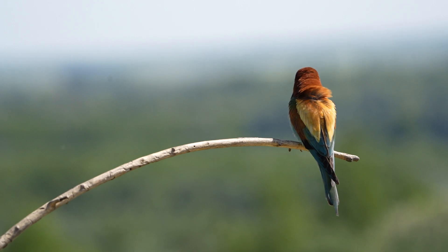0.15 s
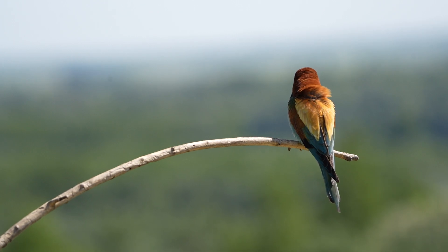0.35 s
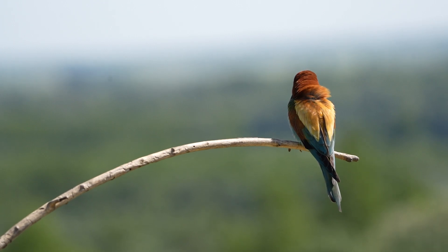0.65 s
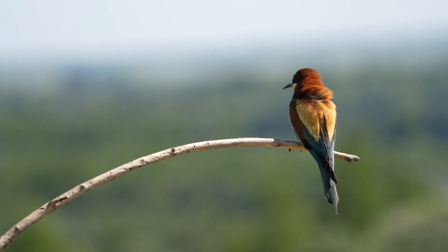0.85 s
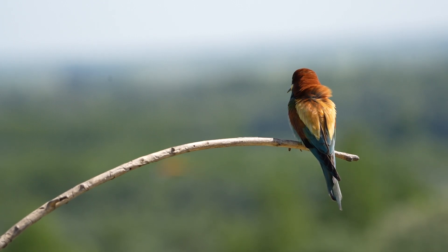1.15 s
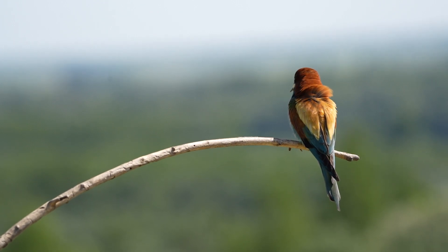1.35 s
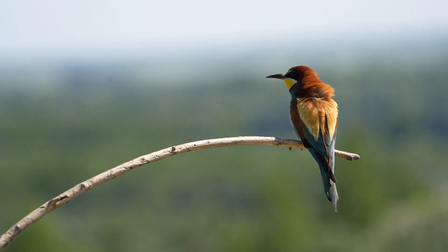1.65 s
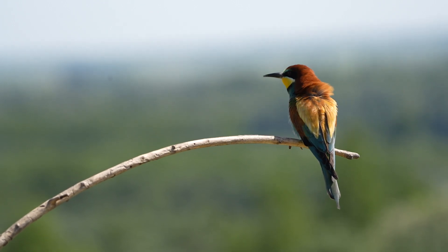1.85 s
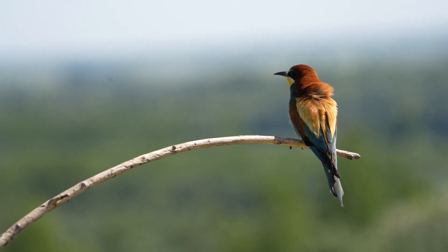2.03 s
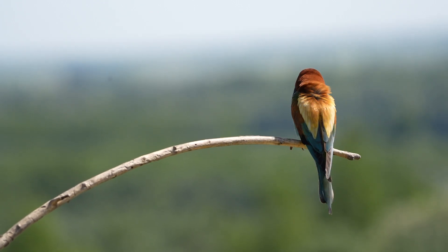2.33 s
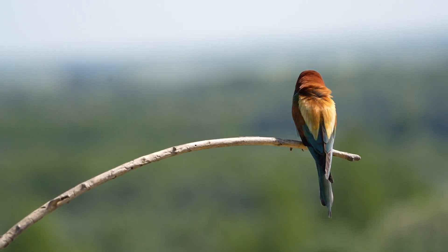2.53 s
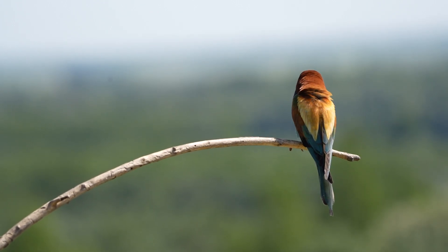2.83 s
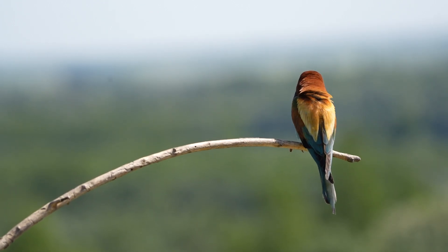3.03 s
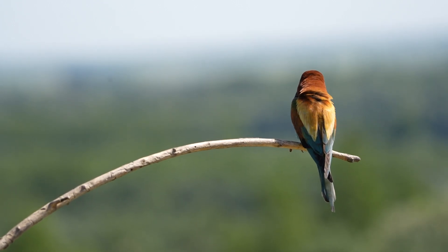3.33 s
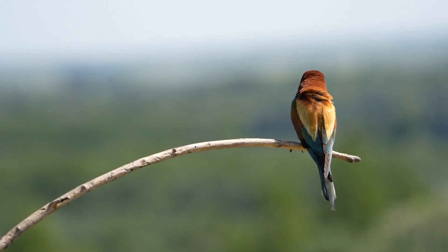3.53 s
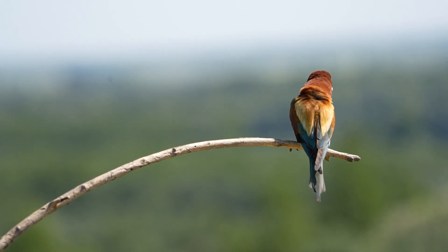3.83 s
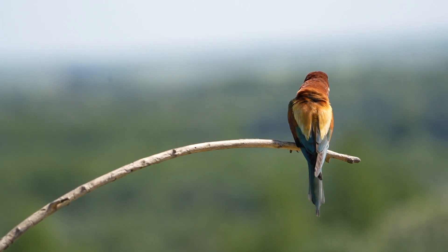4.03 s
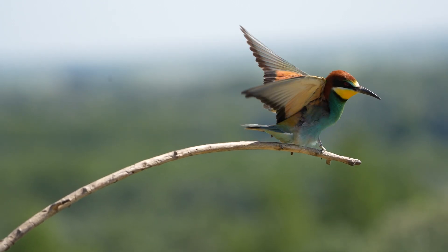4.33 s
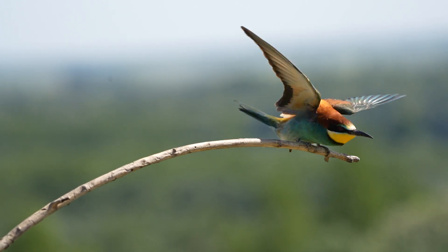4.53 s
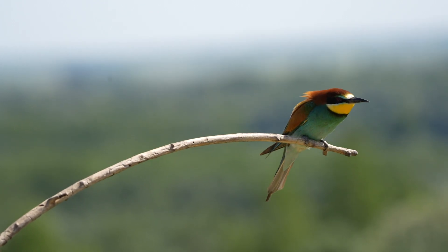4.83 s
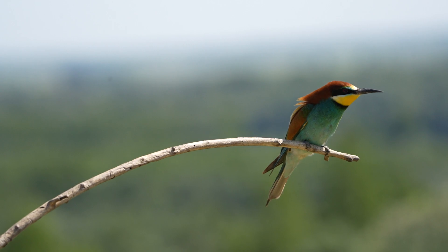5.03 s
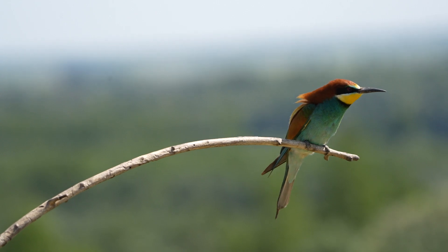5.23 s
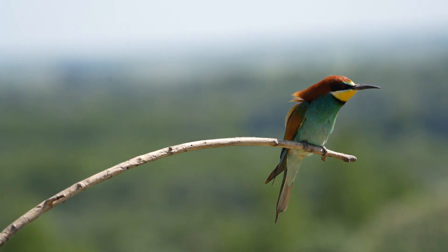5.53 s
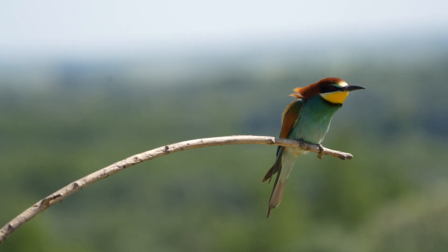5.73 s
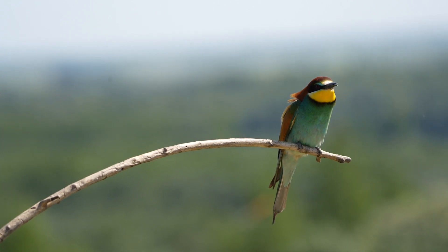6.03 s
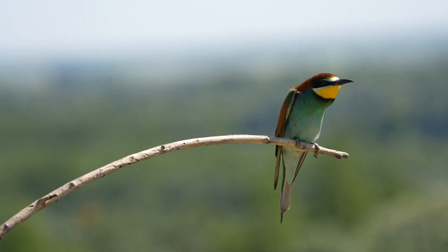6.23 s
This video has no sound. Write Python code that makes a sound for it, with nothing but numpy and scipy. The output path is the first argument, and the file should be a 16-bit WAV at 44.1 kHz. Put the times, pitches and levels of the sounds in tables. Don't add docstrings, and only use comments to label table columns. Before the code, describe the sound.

Mellow rolling bird calls sound close by, separated by gaps of faint colony whistles, high buzzy chirps, soft distant traffic hum and leaf hiss.

```python
import sys
import numpy as np
from scipy import signal
from scipy.fft import rfft, irfft, next_fast_len
from scipy.io import wavfile
from scipy.ndimage import uniform_filter1d, map_coordinates

SR = 44100
rng = np.random.default_rng(int(sys.argv[2]) if len(sys.argv) > 2 else 0)


def wrap_up_sound(samples):
    columns = np.atleast_2d(samples).T
    tamed = np.clip(columns, -1, 1)
    steps = np.round(tamed * 32767).astype(np.int16)
    wavfile.write(sys.argv[1], SR, steps)


def decibels_to_gain(level_db):
    exponent = np.asarray(level_db, float) / 20
    return 10 ** exponent


N = 281358
TIME_S = np.arange(N) / SR

# start t/s, length t/s, plateau f/Hz, level/dB, L-R level/dB
NEAR_CALLS = [
    (-.055, 0.1, 1970, 0, -8),
    (1.579, 0.067, 1780, 0, -9.5),
    (2.238, .067, 1732, 1.5, -9.5),
    (3.098, .05, 1684, -20, -17),
    (4.161, 0.11, 1918, 0.5, -8),
    (4.333, .108, 1895, -11, -13.5),
    (5.326, .08, 1820, -29, -5),
    (6.13, .109, 1874, 0.5, -8),
]
# centre t/s, half width t/s, rise f/Hz, level/dB
FLICKS = [(.0, 0.0065, 482, 7), (0.026, .006, 293, 3.5), (1.620, .005, 543, -1), (2.279, .0045, 416.3, 1.5),
          (3.127, 0.0079, 600, 2), (4.193, .0056, 524, 3), (4.216, .007, 418, 2), (4.241, .005, 330, 3.5),
          (4.364, .0074, 257, 5), (4.382, .0037, 117, -3), (4.412, .014, 131, 3), (5.347, 0.009, 484, 3.5),
          (5.385, .008, 240, -1.5), (6.163, 0.0056, 507, -4.5), (6.186, 0.0067, 398, -7),
          (6.21, 0.0052, 231, -3.5)]
# t/s, dip level/dB
CATCHES = [(1.62, -1), (2.2799, -1), (4.188, -3), (4.2229, -6), (4.2435, -8), (4.385, -17), (6.1592, -7),
           (6.181, -12)]
# f/Hz, level/dB
THROAT = [(1290, -25), (1400, -21.5), (1500, -20.5), (1650, -20.5), (1750, -17), (1850, -8.5), (1950, -7.5),
          (2080, -10.5), (2200, -9), (2400, -14)]
# multiple, level/dB
OVERTONES = [(2, -48.5), (3, -51), (4, -59), (5, -65), (6, -59), (7, -79)]

# start t/s, length t/s, top f/Hz, end f/Hz, level/dB
FAR_LEFT = [(1.675, 0.03, 1820, 1700, -34.5), (1.737, 0.025, 1607, 1570, -37),
            (1.78, 0.034, 1873, 1590, -31), (4.531, 0.033, 2010, 1610, -37.5),
            (5.062, 0.033, 1856, 1830, -46), (5.09, 0.034, 2016, 1760, -39.5),
            (6.321, .043, 2040, 1757, -40.5)]
FAR_RIGHT = [(2.467, 0.033, 2350, 2055, -49.5), (2.784, 0.037, 1905, 1680, -40),
             (2.852, 0.05, 2095, 1590, -39.5), (2.922, 0.015, 1606, 1550, -50),
             (3.232, 0.052, 1840, 1512, -35), (3.28, 0.046, 1598, 1540, -39.5),
             (3.333, 0.027, 1713, 1510, -32), (4.661, 0.043, 1980, 1650, -41),
             (4.731, 0.066, 2120, 1610, -41.5)]
FAR_AHEAD = [(.886, 0.042, 1940, 1860, -52), (0.948, .04, 1980, 1860, -46),
             (1.089, 0.032, 1937, 1770, -46.5), (1.2, 0.07, 1800, 1550, -51),
             (2.526, .033, 1986, 1810, -42.5), (2.628, .042, 1736, 1610, -51),
             (2.98, .033, 1920, 1800, -49.5), (3.039, .032, 2005, 1890, -46),
             (3.874, 0.026, 1980, 1710, -42.5), (4.077, 0.02, 1910, 1690, -49.5),
             (4.62, 0.028, 2040, 1960, -52), (4.702, .024, 2166, 2000, -50)]
# L-R level/dB, overtone level/dB, rise t/s, rise over top f [ratio]
FAR_HABITS = [(11, -34, 0.0164, 0.163), (-23.5, -37, 0.01234, 0.13), (-2.5, -37, .0127, .12)]

# start t/s, pitch factor, stretch factor, level/dB, buzz level/dB
CHIRPS = [(-.011, 1.002, 1.04, -25.5, -30), (1.097, .995, 1.025, -34.5, -33),
          (2.214, 1.015, 0.94, -26, -34), (3.176, 1.003, 0.97, -28, -34.5),
          (3.816, 1.007, 1.02, -24, -29.5), (4.572, .98, 1.007, -26, -29.5), (5.253, .97, 1.01, -27, -30.5),
          (5.990, 1.015, 1.035, -27.5, -30)]
# t/s, f/Hz, level/dB
ARCH = [(-.002, 3960, -22.5), (.002, 4500, -5), (.0095, 5930, -2), (.023, 5640, -3.5), (.0275, 5830, 1),
        (.031, 3900, -7.5), (.033, 3670, -16)]
BUZZ = [(.037, 6030, -22), (.048, 5100, -7), (.054, 4550, -14), (.059, 4820, -4), (0.072, 5430, -7.5),
        (.083, 6600, -24)]
HOOK = [(.069, 2840, -23), (.076, 3620, -12.5), (.083, 4350, -5), (.090, 4670, -0.5), (.104, 4770, -6.5),
        (0.108, 4150, -15), (.121, 5130, -26), (.125, 4500, -45)]
ROUGHNESS = [(1, .1, 0.25, 0.28), (0.97, 0.99, 0.82, 0.74), (.05, .3, 0.8, .4)]
BEAT_HZ = [319, 626, 267]
OCTAVE_DB = [-35, -38, -35.5]
# from t/s, to t/s, centre f/Hz, width f/Hz, level re chirp/dB
LEAKS = [(-.022, .115, 5020, 1020, -22), (.032, 0.083, 10040, 800, -38.5)]

# start t/s, length t/s, resonance f/Hz, level/dB, L-R level/dB
RASPS = [
    (.93, 0.061, 4000, -50, 9),
    (3.579, 0.09, 2600, -52, -2),
    (4.125, 0.04, 7060, -48, 2),
    (4.293, .11, 2860, -47.5, 3),
    (5.109, .071, 6200, -34.5, 10),
    (5.836, 0.058, 4810, -53, -15),
]
# t/s, peak level/dB, L-R level/dB, f/Hz
TICKS = [
    (0.462, -30.5, 26, 12200),
    (.841, -41.5, -16, 9700),
    (1.333, -43, -11, 9900),
    (1.889, -44.5, -12, 10300),
    (2.478, -47, -4, 9000),
    (3.147, -40.5, -15, 10260),
    (4.3308, -34.5, 20, 13000),
    (4.437, -41, -9, 7130),
]

# t/s, level/dB
TRAFFIC = [(0.0, -43.5), (0.41, -44.5), (0.92, -45), (1.58, -45.5), (2.22, -43.5), (2.52, -43.5),
           (2.74, -42), (3.0, -45.5), (3.87, -45), (4.92, -44), (5.08, -44), (5.93, -43), (6.38, -41.5)]
# f/Hz, level/dB per Hz
RUMBLE = [(12, -33), (20, -1.5), (81, -3.5), (151, -2), (300, -7.5), (392, -17.5), (500, -16), (650, -31),
          (1100, -120)]
ROAD = [(210, -38.5), (350, -9), (394, -14.5), (425, -9.5), (599, -8.5), (757, -3), (859, -5), (950, -2),
        (1580, -13.5), (1830, -14), (2600, -24), (3380, -58), (5720, -120)]
PASSING = [(450, -38), (620, -9), (780, 3), (950, -3), (1150, -7), (1500, -58)]
LEAVES = [(1300, -13), (2200, -1.5), (2700, 0), (3400, -0.5), (4300, -5), (5300, -4.5), (5800, -11),
          (6800, -14.5), (8500, -20), (11000, -45)]
MIC_HISS = [(2000, -7), (6000, -1.5), (11000, -1.5), (16000, -2)]
# f/Hz, correlation [-1..1]
ALIKE = [(30, .999), (120, .99), (230, 0.97), (440, 0.74), (870, 0.73), (1690, -0.079), (3300, -0.31),
         (6430, -0.2), (9000, 0.1)]
# f/Hz, L-R level/dB
LEAN = [(40, 0), (100, -1), (170, -0.5), (280, -4), (480, -4.5), (810, -10), (1350, -9), (2280, -7),
        (3830, -1.5), (6430, -4.5), (9000, -0.5)]
# f/Hz, extra L-R level/dB, left lead phase/rad
AHEAD = [(2120, 3, 0), (2340, 0, 1), (2580, 6.5, 0.83)]
HEDGE = [(4250, 10, -3), (4500, 14, -8), (4900, 25, -3), (4980, 21, 1), (5450, 3, 1.7), (6330, 3, 2),
         (6200, -2.5, 2), (9000, -4, 1)]
BEHIND = [(3020, 11, -0.5), (4600, -8, -2.5), (6000, 0, -1.3), (7150, -9.5, -5), (9000, 12, 0.5)]


def near_bird():
    base_hz, glide_share = 1290, 0.12
    longest_gap_s, catch_s = 0.04, 0.0009
    turn_s, turned_db = 4.5, 9.5
    out = np.zeros((2, N))

    gaps_s = np.diff(np.transpose(FLICKS)[0], prepend=0, append=np.inf)
    opens_roll = (gaps_s[:-1] > longest_gap_s) & (gaps_s[1:] < longest_gap_s)
    flick_hz, flick_db = np.zeros(N), np.zeros(N)
    for (centre_s, half_s, rise_hz, db), first in zip(FLICKS, opens_roll):
        squareness = 4.9 if first else 2.15
        bump = np.exp(-np.abs((TIME_S - centre_s) / half_s) ** squareness)
        flick_hz += bump * rise_hz
        flick_db += bump * db
    catch_db = sum(db * np.exp(-((TIME_S - s) / catch_s) ** 2) for s, db in CATCHES)
    air_noise = filtered(rng.standard_normal(N), lambda hz: decibels_to_gain(along(LEAVES, hz)))
    breath = decibels_to_gain(-53) * unit(air_noise)

    for start_s, length_s, plateau_hz, db, pan_db in NEAR_CALLS:
        span = slice(max(round(start_s * SR), 0), round((start_s + length_s) * SR))
        since_s = TIME_S[span] - start_s
        left_s = start_s + length_s - TIME_S[span]
        glide_s = glide_share * length_s
        arch = (1 - np.exp(-since_s / glide_s)) * (1 - np.exp(-left_s / (1.1 * glide_s)))
        jitter_hz = 9 * wobble(312, size=len(since_s))
        hz = base_hz + (plateau_hz - base_hz) * arch + flick_hz[span] + jitter_hz
        edge = np.clip(np.minimum(since_s / 0.0034, left_s / 0.0082), 0, 1)
        level = edge * decibels_to_gain(db + catch_db[span] + 0.27 * wobble(300, size=len(since_s)))
        facing_db = turned_db * (start_s > turn_s)
        overtones = [(k, k_db - 0.33 * db - 6.0 + facing_db * (k > 3)) for k, k_db in OVERTONES]
        gain = decibels_to_gain(along(THROAT, hz) + flick_db[span])
        voice = whistle(hz, overtones, gain, flicker_hz=330, steady=3.25)
        out[:, span] += panned(pan_db) * level * (voice + arch * decibels_to_gain(facing_db) * breath[span])
    return ports(out, AHEAD)


def colony():
    out = np.zeros((2, N))
    for group, habit in zip([FAR_LEFT, FAR_RIGHT, FAR_AHEAD], FAR_HABITS):
        pan_db, overtone_db, rise_s, rise_ratio = habit
        overtones = [(2, overtone_db), (3, overtone_db - 4.0)]
        for start_s, length_s, top_hz, end_hz, db in group:
            u = np.linspace(0, 1, round(length_s * SR))
            crest = np.clip(rise_s / length_s, 0.2, 0.62)
            before = np.clip(1 - u / crest, 0, 1) ** 1.9
            after = np.clip((u - crest) / (1 - crest), 0, 1) ** 0.886
            below_hz = rise_ratio * top_hz * before + (top_hz - end_hz) * np.sin(np.pi / 2 * after) ** 2
            flutter_db = 1.6 * wobble(150, size=len(u))
            level = decibels_to_gain(db + 3.0 + flutter_db) * np.sin(np.pi * u ** 0.84) ** 0.5
            voice = whistle(top_hz - below_hz, overtones, steady=3.1)
            add(out, panned(pan_db) * level * voice, round(start_s * SR))
    return out


def songbird():
    hook_db = 2.5
    leak_grows, usual_db = 0.4, -24.5
    octave_hz, octave_width_hz = 4970, 330
    out = np.zeros((2, N))
    hisses = [leak(centre_hz, width_hz) for _, _, centre_hz, width_hz, _ in LEAKS]
    for start_s, pitch, stretch, chirp_db, buzz_db in CHIRPS:
        for hiss, (begin_s, end_s, *_, db) in zip(hisses, LEAKS):
            u = (TIME_S - start_s - begin_s * stretch) / ((end_s - begin_s) * stretch)
            swell = np.sin(np.pi * np.clip(u, 0, 1)) ** 0.27 * (u < 1)
            out += decibels_to_gain(chirp_db + leak_grows * (chirp_db - usual_db) + db) * hiss * swell

        notes_db = [chirp_db, buzz_db, chirp_db + hook_db]
        parts = zip([ARCH, BUZZ, HOOK], notes_db, ROUGHNESS, BEAT_HZ, OCTAVE_DB)
        for note, note_db, steps, beat_hz, octave_db in parts:
            knots_s, hz, db = np.transpose(note)
            t = np.arange(knots_s[0], knots_s[-1], 1 / (SR * stretch))
            step_s = np.linspace(knots_s[0], knots_s[-1], len(steps))
            rough = np.clip(np.interp(t, step_s, steps), 0, 1)
            beat = np.sin(2 * np.pi * np.cumsum(beat_hz + 40 * wobble(58, size=len(t))) / SR)
            sung_hz = pitch * np.interp(t, knots_s, hz)
            octave = [(2, octave_db - ((sung_hz - octave_hz) / octave_width_hz) ** 2)]
            jitter_hz = 170 * rough * wobble(900, size=len(t))
            tone = whistle(sung_hz + jitter_hz, octave, flicker_hz=570, steady=0.37)
            breath = 1.2 * rough * wobble(900, size=len(t)) + 0.22 * rough * wobble(3500, size=len(t))
            level = decibels_to_gain(note_db + np.interp(t, knots_s, db))
            voice = level * tone * (1 + 0.91 * rough * beat + breath)
            add(out, np.array([voice, voice]), round((start_s + knots_s[0] * stretch) * SR))
    return ports(out, HEDGE)


def leak(centre_hz, width_hz):
    noise = rng.standard_normal(N)
    return unit(filtered(noise, lambda hz: np.exp(-((hz - centre_hz) / width_hz) ** 2)))


def rasps():
    out = np.zeros((2, N))
    for start_s, length_s, throat_hz, db, pan_db in RASPS:
        u = np.linspace(0, 1, round(length_s * SR))
        pulse_hz = (554 + 0.066 * throat_hz) * (1 + 0.048 * wobble(400, size=len(u)))
        pulses = np.diff(np.floor(np.cumsum(pulse_hz) / SR), prepend=0)
        pulses = pulses + 0.15 * rng.standard_normal(len(u)) * (u + 0.15)
        voice = signal.lfilter(*signal.iirpeak(throat_hz, 1.1, SR), pulses)
        voice = signal.lfilter(*signal.iirpeak(throat_hz, 1.4, SR), voice)
        voice = signal.sosfilt(signal.butter(3, 1.15 * throat_hz, fs=SR, output="sos"), voice)
        swell = np.sin(np.pi * u ** 0.56) ** 1.5
        add(out, panned(pan_db) * decibels_to_gain(db) * unit(voice) * swell, round(start_s * SR))
    return ports(out, BEHIND)


def twig_ticks():
    out = np.zeros((2, N))
    t = np.arange(200) / SR
    for start_s, db, pan_db, hz in TICKS:
        ring = decibels_to_gain(db + 5.5 - 60 * t / 0.00195) * np.sin(2 * np.pi * hz * t)
        add(out, panned(pan_db) * ring, round(start_s * SR))
    return out


def air():
    road_db = np.interp(TIME_S, *np.transpose(TRAFFIC))
    mean_db = road_db.mean()
    rumble_db = mean_db - 4.5 + 0.96 * (road_db - mean_db)
    passing_db = -39 - 14 * ((TIME_S - 2.73) / 0.13) ** 2
    rumble = decibels_to_gain(rumble_db) * rush(RUMBLE, patchy_db=0.8)
    road = decibels_to_gain(road_db + 0.97 + 0.5 * wobble(10)) * rush(ROAD, patchy_db=0.28)
    passing = decibels_to_gain(passing_db) * rush(PASSING, patchy_db=-1.0)
    leaves = decibels_to_gain(-58 + 0.17 * wobble(1.5)) * rush(LEAVES, patchy_db=1.3)
    mic_hiss = decibels_to_gain(-66.0) * rush(MIC_HISS, patchy_db=-0.4)
    return rumble + road + passing + leaves + mic_hiss


def rush(spectrum, patchy_db):
    z = signal.stft(rng.standard_normal((2, N + 512)), nperseg=512)[2]
    field = uniform_filter1d(rng.standard_normal(z.shape[1:]), 5, 0)
    field = uniform_filter1d(field, 12, 1)
    pair = signal.istft(z * decibels_to_gain(patchy_db * unit(field)), nperseg=512)[1][:, :N]

    def mid_side(hz):
        angle = np.arccos(np.clip(along(ALIKE, hz), -1, 1)) / 2
        return decibels_to_gain(along(spectrum, hz)) * [np.cos(angle), np.sin(angle)]

    mid, side = filtered(pair, mid_side)
    both = np.array([mid + side, mid - side])
    both = filtered(both, lambda hz: decibels_to_gain(along(LEAN, hz) * [[0.5], [-0.5]]))
    return both / np.std(both.mean(0))


def echoes(x, t60_s, top_hz):
    t = np.arange(SR // 3) / SR
    tail = rng.standard_normal((2, len(t))) * decibels_to_gain(-60 * t / t60_s) * (t > 0.003)
    wet = signal.fftconvolve(x, tail / np.linalg.norm(tail[0]), axes=1)[:, :N]
    return filtered(wet, lambda hz: 1 / (1 + 1j * hz / top_hz))


def ports(x, direction):
    shade_db = [(hz, db) for hz, db, lead in direction]
    lead_rad = [(hz, lead) for hz, db, lead in direction]
    right = filtered(x[1], lambda hz: decibels_to_gain(-along(shade_db, hz)) * np.exp(-1j * along(lead_rad, hz)))
    return np.array([x[0], right])


def whistle(hz, overtones, gain=1, flicker_hz=150, steady=1.3):
    phase = 2 * np.pi * np.cumsum(hz) / SR
    out = gain * np.sin(phase)
    for k, db in overtones:
        strength = steady / max(k - 2, 1) ** 1.5 + wobble(flicker_hz, size=len(hz))
        out = out + decibels_to_gain(db) * strength * np.sin(round(k) * phase)
    return out


def panned(pan_db):
    return decibels_to_gain(np.array([[min(pan_db, 0)], [min(-pan_db, 0)]]))


def add(out, sound, start):
    room = out[:, max(start, 0):max(start + sound.shape[1], 0)]
    room += sound[:, max(-start, 0):][:, :room.shape[1]]


def wobble(rate_hz, size=N):
    knots = rng.standard_normal(int(N * abs(rate_hz) / SR) + 4)
    return map_coordinates(knots, [np.arange(size) * abs(rate_hz) / SR])


def filtered(x, response):
    m = next_fast_len(N + 8192)
    return irfft(rfft(x, m) * response(np.fft.rfftfreq(m, 1 / SR)), m)[..., :N]


def along(points, hz):
    f, v = np.transpose(points)
    return np.interp(np.log(hz + 1), np.log(f + 1), v)


def unit(x):
    return x / np.sqrt(np.mean(np.abs(x) ** 2) + 1e-20)


def scene():
    near, far, small = near_bird(), colony(), songbird()
    near_wet = decibels_to_gain(-22.5) * echoes(near, t60_s=0.2, top_hz=4000)
    far_wet = decibels_to_gain(-6) * echoes(far, t60_s=0.055, top_hz=4000)
    hedge_wet = decibels_to_gain(-12) * echoes(small, t60_s=0.075, top_hz=9000)
    birds = near + far + small + near_wet + far_wet + hedge_wet
    return birds + rasps() + twig_ticks() + air()


def top_cut(x):
    return signal.sosfilt(signal.butter(12, 15780, fs=SR, output="sos"), x)


def record(dry):
    return top_cut(dry)


dry = scene()
out = record(dry)
wrap_up_sound(out)
```